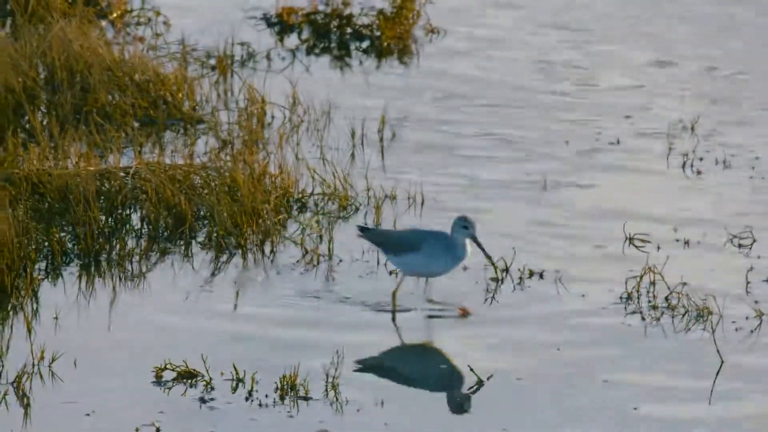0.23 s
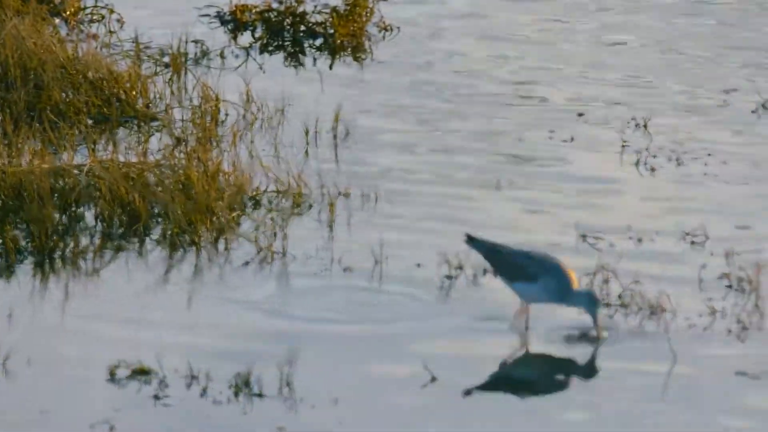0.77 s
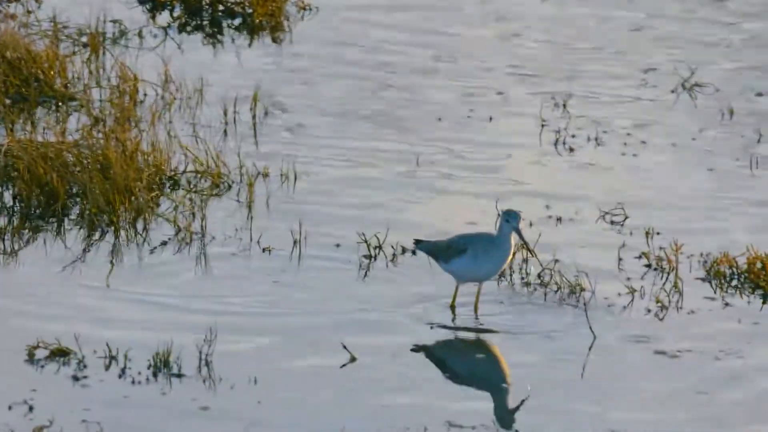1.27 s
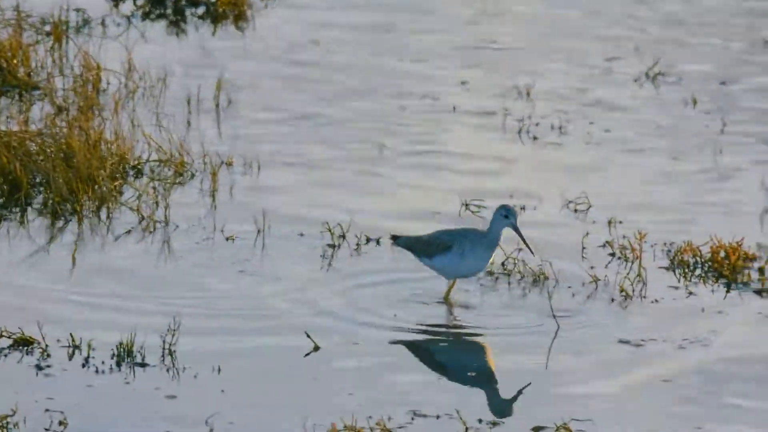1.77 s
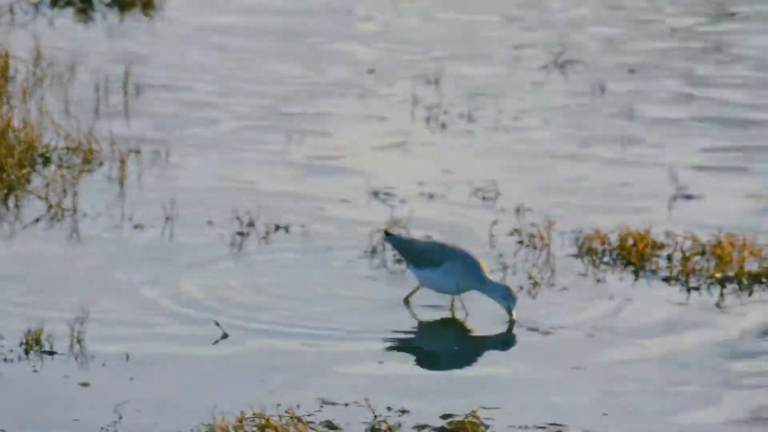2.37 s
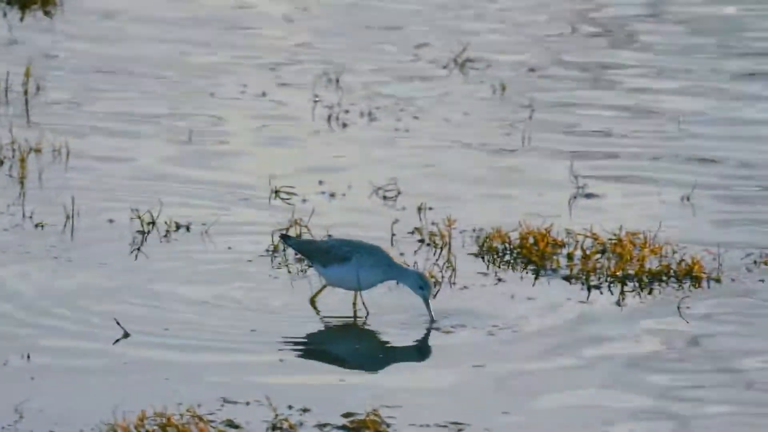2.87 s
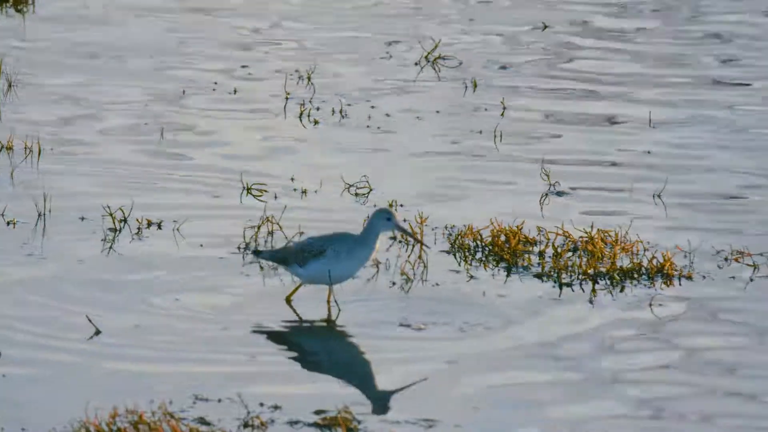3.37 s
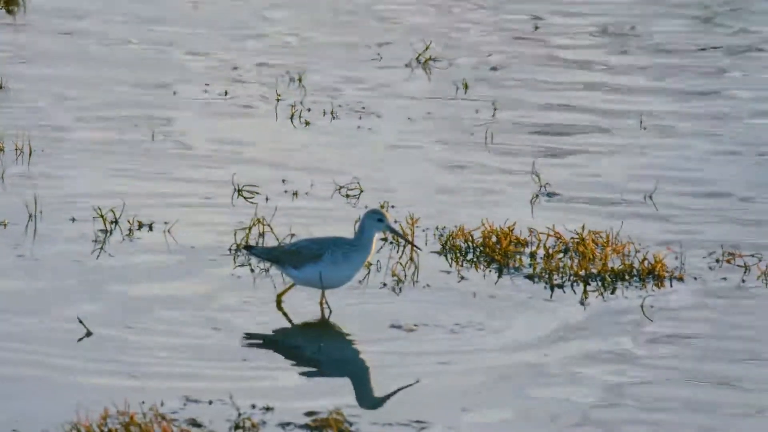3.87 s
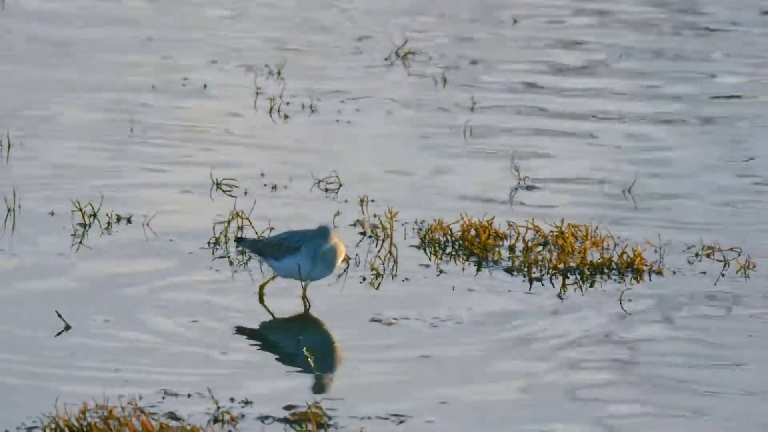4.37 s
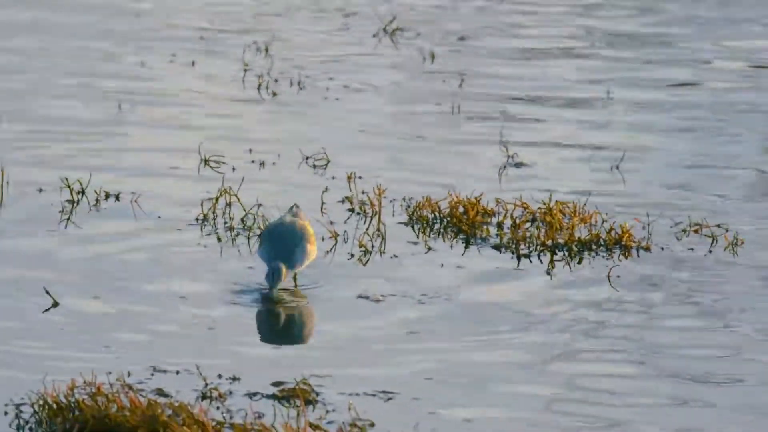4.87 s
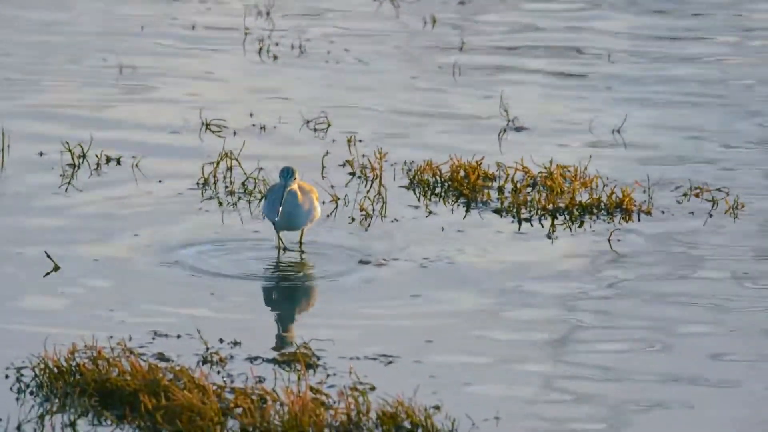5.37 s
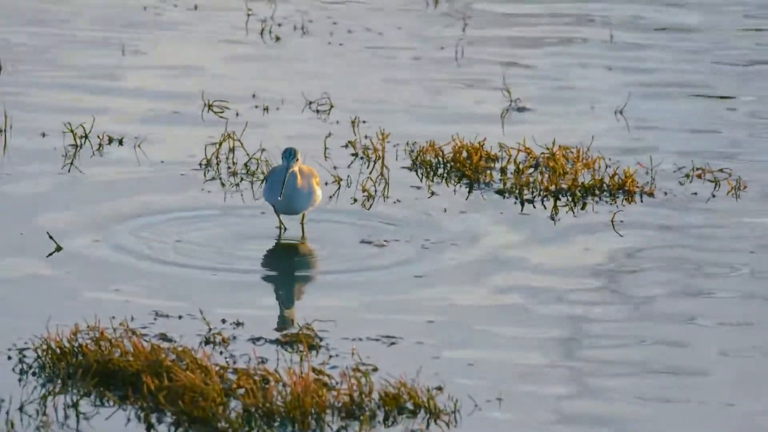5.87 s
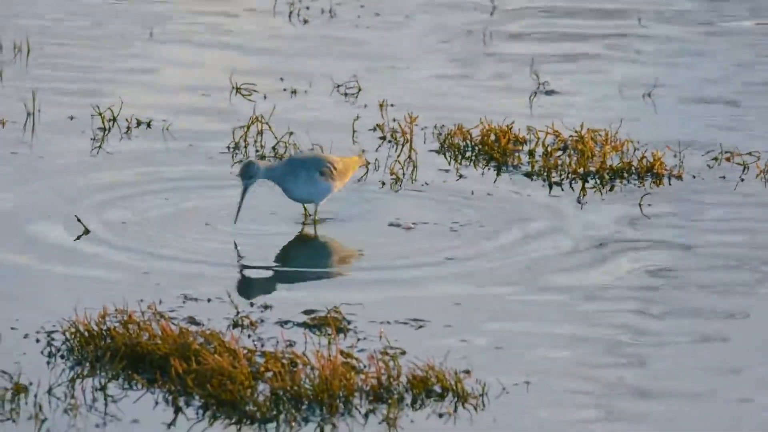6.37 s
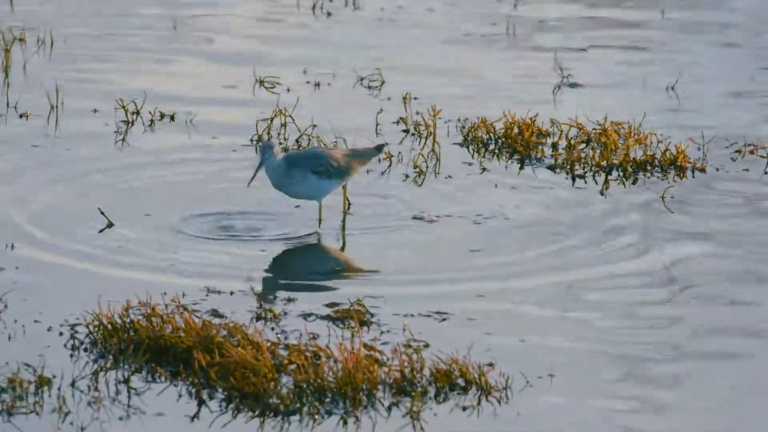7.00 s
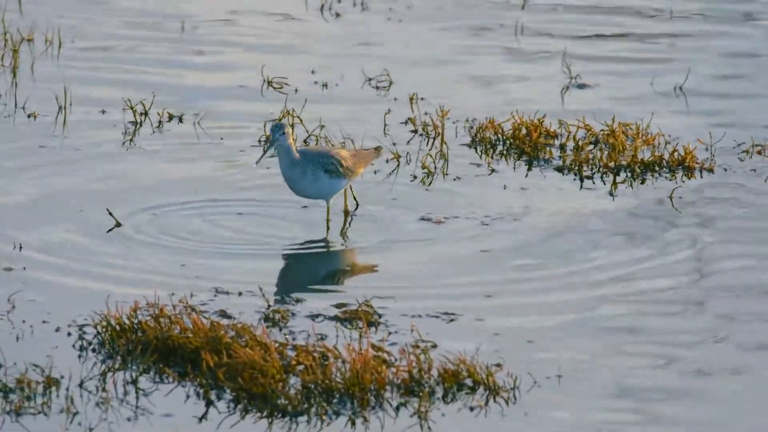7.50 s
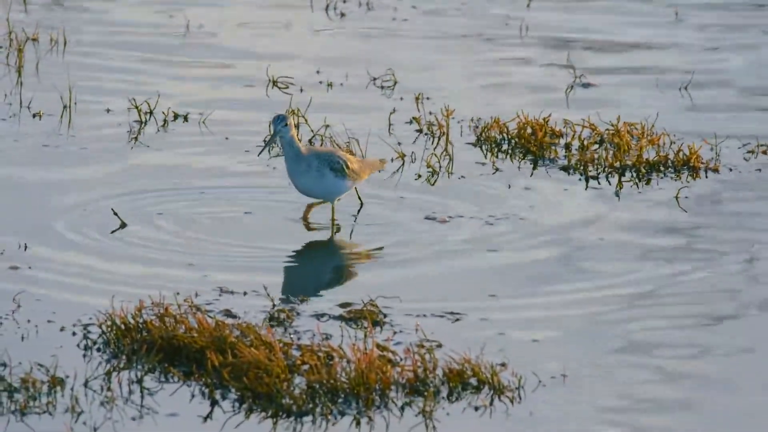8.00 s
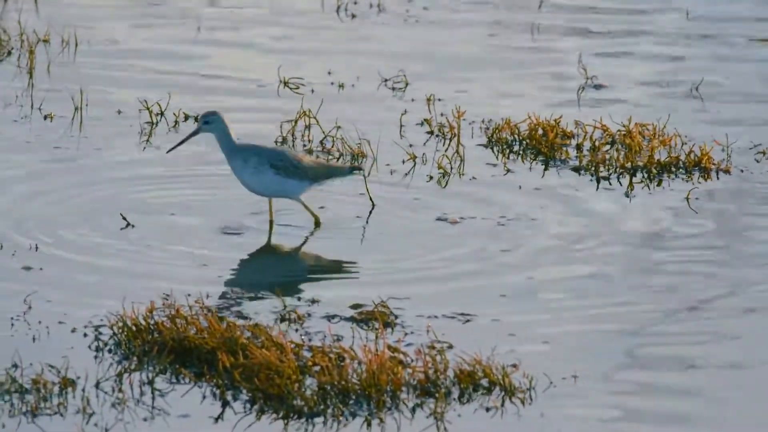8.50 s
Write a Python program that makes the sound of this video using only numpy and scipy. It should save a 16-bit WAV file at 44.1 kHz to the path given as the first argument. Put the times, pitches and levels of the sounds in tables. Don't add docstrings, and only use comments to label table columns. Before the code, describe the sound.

Throughout, irregular wind presses on a small microphone in marsh reeds: very low heaving, thumping buffets and short flutters, strongest around 3.5 s, with further surges near 5.8, 7.5 and 8 s. Behind it, a distant flock and reeds form a soft, patchy murmur with faint level low coos, over steady recorder hiss. From 0.1 to 3.1 s a far wader whistles a slow series of thin, quickly falling notes, clearest around 2.3-2.7 s. Two tiny bright droplet flicks from a bill touch the water at about 0.7 and 0.95 s. A smaller bird gives brief faint peeps near 1.8, 2.3-2.5, 3.5, 4.1, 6.1 and 6.6 s. The wader returns slightly nearer in short phrases at 3.9-4.4, 5.8-6.5 and 7.4-7.8 s, with faint brief echoes. From about 8 s the murmur and hiss creep up until the end at 8.7 s.

```python
import sys
import numpy as np
from scipy import signal
from scipy.fft import rfft, irfft, next_fast_len
from scipy.io import wavfile
from scipy.ndimage import uniform_filter1d, map_coordinates

SR = 44100
rng = np.random.default_rng(int(sys.argv[2]) if len(sys.argv) > 2 else 0)


def how_loud(loudness_db):
    steps = np.asarray(loudness_db, float) / 20
    return 10 ** steps


def unload_wav(signal):
    wavfile.write(
        sys.argv[1],
        SR,
        np.round(np.clip(np.atleast_2d(signal).T, -1, 1) * 32767).astype(np.int16),
    )


N = 385598

# time in seconds, strength in dB.
GUSTS = [(0, -35.5), (.5, -42), (1.2, -36.5), (1.8, -35.5), (2.4, -40), (2.9, -37), (3.5, -28.5),
         (3.9, -31.5), (4.4, -40), (5.2, -37.5), (5.75, -31), (6.6, -35), (6.75, -41.5), (7.1, -40.5),
         (7.45, -32), (8.05, -36.5), (8.4, -36), (8.74, -37.5)]
# centre in seconds, half length in seconds, lift in dB,
# size from 0 (large and slow) to 2 (small and quick).
EDDIES = [ (.15, 0.059, 11.5, -0.16), (.17, .08, 9, 1.95), (.001, 0.036, -5, -0.026),
          (.95, 0.041, 9.5, -0.11), (1.22, 0.039, 12, 1.37), (1.41, 0.031, 11.5, .05),
          (1.45, .04, -12, 0.37), (1.52, 0.036, -8, -0.26), (2.3, 0.076, 3.5, 0.29), (2.37, .03, -9, 1.05),
          (2.55, 0.055, -11, 0.28), (2.62, .07, 17, 1.4), (2.9, .05, 17.5, 0.61), (3.03, .05, 7, 1.43),
          (3.74, 0.1, 3.5, -0.21), (4.29, 0.06, -10, .05), (4.3, 0.038, 6.5, 0.88), (4.45, 0.12, 3.5, .05),
          (4.83, 0.047, 9, 0.91), (5.14, 0.17, 1, 0.3), (5.36, 0.069, -11, .05), (5.82, 0.18, -0.5, -0.62),
          (6.23, 0.069, 11, 1.54), (6.62, 0.027, 14, 1.28), (7.27, 0.067, -9, 0.16),
          (7.76, 0.034, 20, 0.46), (7.88, 0.046, -14, 0.31), (8.05, 0.19, 13, 0.29),
          (8.38, 0.089, -11, 0.65), (8.52, 0.035, 12, .2)]
# frequency in Hz, density in dB per Hz.
HEAVE = [(2, -13.5), (3.5, -4.5), (14, -8), (22, -14.5), (30, -35.5), (50, -120)]
BUFFET = [(10, -120), (17, -32), (24, 6), (40, 1.5), (58, -8), (75, -25.5), (120, -120)]
FLUTTER = [(30, -120), (48, -31), (62, -2), (100, -8), (150, -17), (210, -29), (300, -34.5), (500, -120)]
# frequency in Hz, density in dB per Hz.
MURMUR = [(60, -120), (130, -3.5), (220, -5), (300, -6), (366, -8.5), (500, -6), (620, -4), (700, -1.5),
          (950, -3), (1300, -10), (1900, -21.5), (2600, -30), (4500, -34.5), (8000, -120)]
# frequency in Hz, density in dB per Hz.
HISS = [(100, 5), (3000, 0), (8000, 0), (15000, -0.5)]
# time in seconds, gain in dB.
GAIN = [(0, 0), (7.9, 0), (8.2, 1.5), (8.5, 2), (8.74, 2.5)]
# crest time in seconds, drop length in seconds,
# crest pitch in Hz, knee pitch in Hz, peak level in dB.
FAR_WADER = [(.127, .02, 2910, 2720, -74.5), (.693, .02, 2900, 2600, -75), (.755, .018, 2760, 2600, -72),
             (1.246, .022, 2860, 2631, -70), (1.394, .04, 3035, 2635, -71), (1.558, .03, 3020, 2760, -71),
             (1.72, .03, 3038, 2800, -75), (1.905, .03, 2950, 2648, -69), (2.09, .022, 2860, 2646, -69.5),
             (2.27, .03, 3000, 2620, -65), (2.452, .039, 3048, 2564, -63), (2.627, .052, 3066, 2610, -64.5),
             (2.843, .046, 3014, 2560, -69), (3.047, .044, 3040, 2587, -69.5)]
# crest time in seconds, drop length in seconds,
# crest pitch in Hz, knee pitch in Hz, peak level in dB.
NEAR_WADER = [(3.91, .034, 2917, 2711, -64), (4.035, .033, 2906, 2703, -61),
              (4.183, .038, 2955, 2706, -61.5), (4.336, .052, 2940, 2590, -63),
              (5.81, .019, 3026, 2795, -69), (5.94, .046, 3020, 2720, -64.5), (6.136, .04, 2790, 2620, -64),
              (6.306, .034, 2820, 2590, -64), (6.449, .025, 2988, 2706, -69.5),
              (7.431, .031, 2886, 2714, -61.5), (7.575, .045, 2961, 2580, -62),
              (7.737, .037, 2849, 2510, -63)]
# start in seconds, length in seconds, pitch in Hz, level in dB.
COOS = [(.22, .44, 321, -63.5), (1.3, .5, 320.5, -67), (2.12, .2, 320, -68), (2.38, .5, 320, -63),
        (3.2, .45, 320, -68.5), (4.1, .7, 318.5, -68.5), (4.78, .28, 303, -64), (4.98, .16, 329, -66.5),
        (5.3, .55, 316, -66.5), (5.98, .5, 318.5, -61), (6.5, .3, 317, -68), (6.62, .3, 331, -67.5),
        (7, .35, 316, -64), (7.3, .7, 316.5, -63), (7, .66, 302.5, -69), (7.68, .45, 331, -68),
        (8.1, .6, 303, -64.5), (8.3, .5, 316, -68)]
# pitch in Hz, level in dB.
COO_BLUR = [
    (318, -77),
    (304, -78),
]
# start in seconds, length in seconds, level in dB.
FLICKS = [
    (.676, .032, -68),
    (.939, .024, -66.5),
]
# frequency in Hz, density in dB per Hz.
SPRAY = [(1500, -120), (2800, -4), (5000, 2), (7000, -6), (9000, -20), (14000, -120)]
# start in seconds, length in seconds, start pitch in Hz, end pitch in Hz, level in dB.
PEEPS = [
    (1.84, .1, 1750, 2300, -74),
    (2.287, .026, 4380, 4460, -71),
    (2.334, .018, 3840, 3770, -65),
    (2.43, .06, 3650, 3580, -72),
    (3.545, .03, 2200, 2050, -70),
    (4.072, .04, 3570, 3300, -71),
    (4.215, .05, 3520, 3300, -73),
    (6.095, .035, 3800, 3620, -73),
    (6.63, .03, 3675, 3500, -74),
]


def unit(x):
    return x / np.sqrt(np.mean(x ** 2) + 1e-20)


def curve(rows):
    seconds, db = np.transpose(rows)
    return np.interp(np.arange(N) / SR, seconds, db)


def wobble(rate):
    knots = rng.standard_normal(int(N * 40 / SR) + 4)
    return map_coordinates(knots, [np.arange(N) * rate / SR])


def filtered(x, response):
    m = next_fast_len(N + SR)
    return irfft(rfft(x, m) * response(np.fft.rfftfreq(m, 1 / SR)), m)[:N]


def coloured(x, spectrum):
    f, db = np.transpose(spectrum)
    return unit(filtered(x, lambda hz: how_loud(np.interp(np.log(hz + .1), np.log(f), db))))


def patchy(depth_db):
    z = signal.stft(rng.standard_normal(N), nperseg=1024)[2]
    field = uniform_filter1d(rng.standard_normal(z.shape), size=6, axis=0)
    field = uniform_filter1d(field, size=8, axis=1)
    return signal.istft(z * how_loud(depth_db * unit(field)), nperseg=1024)[1][:N]


def steady_noise(spectrum, seconds):
    x = coloured(rng.standard_normal(N), spectrum)
    power = np.abs(uniform_filter1d(x ** 2, int(seconds * SR)))
    return unit(x / np.sqrt(power + 0.068))


def eddy_lift(layer):
    t = np.arange(N) / SR
    lift = np.zeros(N)
    for s, half, lift_db, size in EDDIES:
        share = np.exp(-((size - layer) / .6) ** 2)
        lift += share * lift_db * np.exp(-((t - s) / half) ** 2)
    return lift


def wind():
    calm_db = -35
    gust_db = curve(GUSTS) - calm_db
    heave = how_loud(6 + 0.78 * gust_db + eddy_lift(0)) * steady_noise(HEAVE, seconds=0.25)
    buffet = how_loud(1.14 * gust_db + eddy_lift(1)) * steady_noise(BUFFET, seconds=0.127)
    flutter = how_loud(-10.5 + 0.85 * gust_db + eddy_lift(2)) * steady_noise(FLUTTER, seconds=.12)
    speed = how_loud(calm_db) * (heave + buffet)
    suction = .9 * (speed ** 2 - uniform_filter1d(speed ** 2, SR // 4))
    return speed - suction + how_loud(calm_db + 1.64 * wobble(12)) * flutter


def murmur():
    level_db = -55 + 1.8 * curve(GAIN) + .5 * wobble(3)
    return how_loud(level_db) * coloured(patchy(depth_db=0.82), MURMUR)


def hiss():
    level_db = -61 + curve(GAIN) + 0.33 * wobble(5)
    return how_loud(level_db) * coloured(patchy(depth_db=0.82), HISS)


def wader():
    rise_s, hook_hz, sag_hz_per_s = .018, 60, 2700
    out = np.zeros(N)
    notes = [(*note, -14) for note in FAR_WADER] + [(*note, -9.5) for note in NEAR_WADER]
    for s, drop, crest_hz, knee_hz, db, head_db in notes:
        sag = .6 * drop
        end = drop + sag
        t = np.arange(-rise_s, end, 1 / SR)
        corners_hz = [crest_hz - hook_hz, crest_hz, knee_hz, knee_hz - sag_hz_per_s * sag]
        pitch = np.interp(t, [-rise_s, 0, drop, end], corners_hz)
        pitch = uniform_filter1d(pitch, size=400, mode="nearest")
        swell_db = np.interp(t, [-rise_s, drop - 0.01, drop + sag / 3, end], [head_db, 0, 0, -2])
        fades = np.clip(np.minimum(t - t[0], t[-1] - t) / .005, 0, 1)
        tone = np.sin(2 * np.pi * np.cumsum(pitch) / SR)
        out[round((s - rise_s) * SR):][:len(t)] += how_loud(db + swell_db) * fades * tone
    return out * how_loud(1.8 * wobble(40))


def marsh_echoes(x):
    t = np.arange(SR // 4) / SR
    tail = rng.standard_normal(len(t)) * how_loud(-60 * t / 0.14)
    return signal.fftconvolve(x, tail / np.linalg.norm(tail))[:N]


def slur(u):
    return .75 * np.sin(np.pi / 2 * u) ** 2 + .25 * u


def whistles(notes, edge, shimmer_db, shimmer_rate):
    out = np.zeros(N + SR)
    for s, length, start_hz, end_hz, db in notes:
        u = np.arange(int(length * SR)) / (length * SR)
        pitch = start_hz + (end_hz - start_hz) * slur(u)
        tone = np.sin(2 * np.pi * np.cumsum(pitch) / SR)
        out[round(s * SR):][:len(u)] += how_loud(db) * np.sin(np.pi * u) ** edge * tone
    return out[:N] * how_loud(shimmer_db * wobble(shimmer_rate))


def coos():
    notes = [(s, length, hz, hz, db) for s, length, hz, db in COOS]
    out = how_loud(1.2) * whistles(notes, edge=.5, shimmer_db=.8, shimmer_rate=6)
    for hz, db in COO_BLUR:
        level = how_loud(db + 3.6 * wobble(2.58))
        pitch = hz + 1.516 * wobble(5)
        out += level * np.sin(2 * np.pi * np.cumsum(pitch) / SR)
    return out


def flicks():
    t = np.arange(N) / SR
    shape = sum(how_loud(db) * np.sin(np.pi * np.clip((t - s) / length, 0, 1)) for s, length, db in FLICKS)
    droplets = rng.standard_normal(N) * how_loud(4 * rng.standard_normal(N))
    return shape * coloured(droplets, SPRAY)


def peeps():
    return whistles(PEEPS, edge=.8, shimmer_db=1.5, shimmer_rate=38)


def scene():
    birds = wader() + peeps()
    echoes = how_loud(-13) * marsh_echoes(birds)
    return (wind() + murmur() + birds + echoes + coos() + flicks())[None]


def band_limit(x):
    return signal.sosfilt(signal.butter(12, 16500, fs=SR, output="sos"), x)


def record(dry):
    top_hz = 15775
    mix = filtered(dry[0] + hiss(), lambda hz: np.clip((top_hz - hz) / 50, 0, 1))
    return band_limit(mix[None])


dry = scene()
out = record(dry)
unload_wav(out)
```